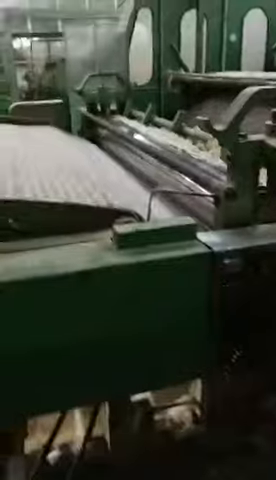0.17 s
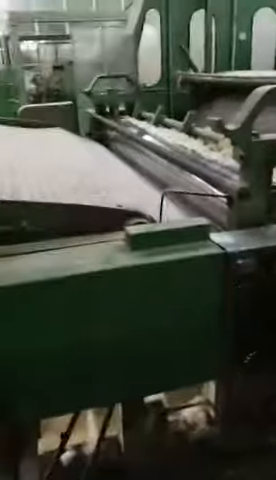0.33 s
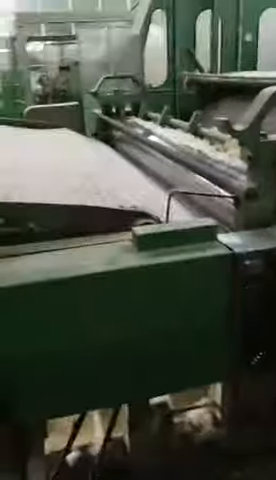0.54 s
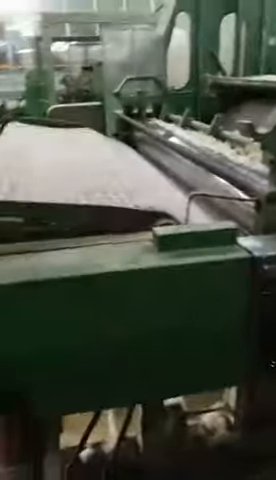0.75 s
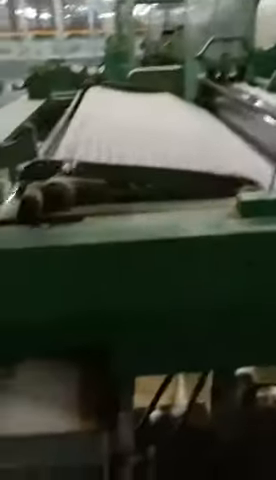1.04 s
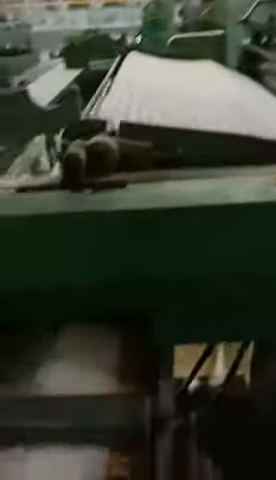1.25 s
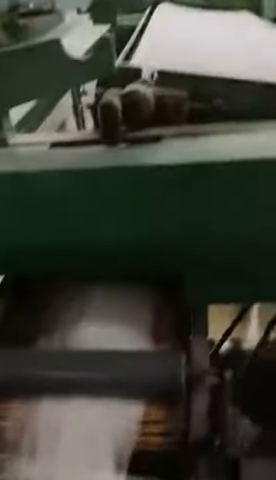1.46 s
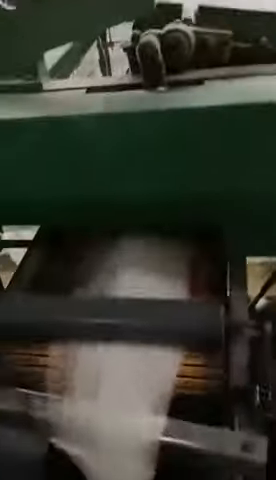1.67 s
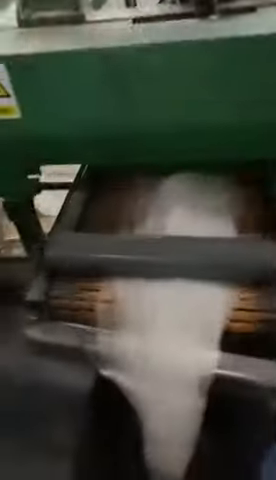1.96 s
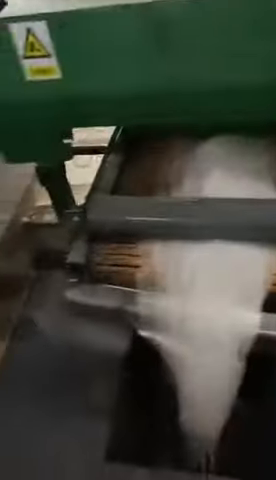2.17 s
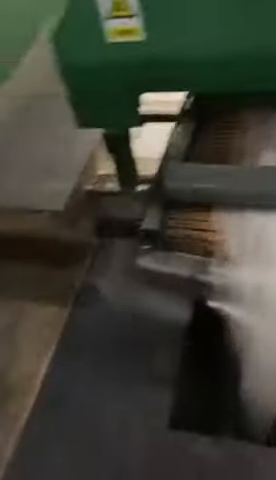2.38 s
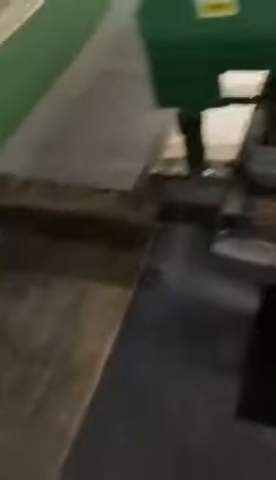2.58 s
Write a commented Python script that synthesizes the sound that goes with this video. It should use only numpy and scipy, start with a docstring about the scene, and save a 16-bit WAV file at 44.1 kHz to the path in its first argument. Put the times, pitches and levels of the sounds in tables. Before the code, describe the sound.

A large textile carding machine fades in over the first 0.4 seconds and roars steadily in a factory hall until the end, near 2.7 seconds. A high, wavering gear whine rides on top, shifting between left and right as the phone moves, with a hum, ringing clatter and thin hiss. Faint knocks of loose parts come at about 0.5, 1 and 2.1 seconds.

```python
"""Out of a brief silence, the broad roar of a carding machine's drums, belts and air fades in.
The place is a factory hall, the microphone a hand-held phone panning slowly along the machine.
The roar carries a shaft's steady hum and a gear whine near 3 kHz: a narrow band of noise with tones
spaced by the shaft speed. A weaker band sits an octave up, wire and fibre hiss, and loose parts clack."""
import sys
import numpy as np
from scipy import signal
from scipy.fft import rfft, irfft, next_fast_len
from scipy.io import wavfile
from scipy.ndimage import uniform_filter1d, map_coordinates

SR = 44100
rng = np.random.default_rng(int(sys.argv[2]) if len(sys.argv) > 2 else 0)


def put_to_file(sound):
    """Save the sound as 16-bit audio at rate SR, in the file named by the first command-line argument."""
    columns = np.atleast_2d(sound).T  # one column per channel
    safe = np.clip(columns, -1, 1)
    whole_steps = np.round(safe * 32767)
    wavfile.write(sys.argv[1], SR, whole_steps.astype(np.int16))


N = 119952
TIME_S = np.arange(N) / SR
SHAFT_HZ = 10.223

# The machine's body as the phone moves along it: time_s, roar_db, clatter_db
ROAR_LEVELS = [(.45, -20.5, -27.5), (.85, -21, -29.5), (1.12, -22, -27), (1.4, -21.5, -30),
               (1.9, -21.5, -32), (2.2, -21.5, -30), (2.7, -21, -31.5)]
# Spectra of the low roar and the midrange clatter: frequency_hz, gain_db
ROAR_SPECTRUM = [(15, -59.5), (30, -30), (50, -23), (90, -7.5), (150, -4), (250, -4.5), (320, -0.5),
                 (400, -5), (530, -3.5), (600, -6), (700, -10.5), (870, -10.5), (1000, -15.5), (1300, -35),
                 (2200, -120)]
CLATTER_SPECTRUM = [(590, -40), (1000, -4.5), (1070, 0), (1150, -3), (1270, 0.5), (1500, -2.5), (1730, -3),
                    (1870, -1.5), (2240, -1.5), (2500, -3), (3250, -41), (5500, -120)]

def drum_roar():
    """Drums, belts and air fill the hall with a low roar and a ringing clatter above it."""
    roar_db, clatter_db = curves(ROAR_LEVELS)
    roar = amp(roar_db) * rush(ROAR_SPECTRUM, patchy_db=0.7, ringing_db=0.8, flutter_db=0.75)
    clatter = amp(clatter_db) * rush(CLATTER_SPECTRUM, patchy_db=2.0, ringing_db=4.0, flutter_db=0.3)
    return roar + clatter


# The whine at the moving phone: time_s, band_db, left_minus_right_db, left_lead_rad
WHINE_PATH = [(.45, -20.5, 1.5, 1.55), (.85, -20, 1.5, 1.5), (1.2, -20.5, 4, 1.5), (1.55, -21, -2, 0.05),
              (1.9, -21, 5, -1.85), (2.2, -20, 2, -2.5), (2.45, -19.5, 3.5, -0.5), (2.7, -24, 0.5, -2)]
# Noise band round the mesh tone: frequency_hz, gain_db
WHINE_SPECTRUM = [(2300, -50), (2450, -14), (2580, -15.5), (2750, -6), (2880, -5.5), (2980, 1),
                  (3070, -10.5), (3200, -9.5), (3250, -24.5), (3300, -29), (3360, -61)]
# Weak sidebands: offset_orders (shaft speeds from the mesh tone); for each, level_db
WEAK_OFFSETS = [-26, -17, -15, -11, 3, 11, 13, 16, 17, 20, 28]
WEAK_LEVELS = [-48, -42, -44, -42, -39, -38, -43, -46, -40, -43, -48]
# Loud core tones: offset_orders; their swells: time_s, then level_db for each tone
CORE_OFFSETS = [-6, 0, 5, 6]
CORE_LEVELS = [(.55, -26.5, -31, -27, -41), (.8, -39, -35, -33, -35), (1.0, -38.5, -40, -37, -24),
               (1.3, -31, -26.5, -30.5, -34.5), (1.55, -41.5, -32.5, -26.5, -34),
               (1.8, -26, -34, -33, -32.5), (2.05, -44, -29, -29, -35), (2.3, -36, -28.5, -40.5, -35),
               (2.6, -39, -33, -34, -28)]
# Swelling of the band once and twice per beat: depth_fraction
THROB_DEPTHS = [.08, .08]

def gear_whine(mesh_hz=2921.6, beat_order=11, direct_over_hall_db=-3.5):
    """Meshing gears sing with shaft sidebands in a noise band that throbs at the tones' beat rate."""
    band_db, pan_db, lead = curves(WHINE_PATH)
    # Tones one beat rate apart are locked in phase.
    locked_phases = rng.uniform(0, 2 * np.pi, (beat_order, 1)) + 1.2 * wobble(4.8)

    def sideband(offset, db, waver_db):
        phase = locked_phases[offset % beat_order]
        return hall_tone(mesh_hz + offset * SHAFT_HZ, db, waver_db, drift_rad=0.24, lead=lead, phase=phase)

    weak = sum(sideband(k, db, waver_db=3.5) for k, db in zip(WEAK_OFFSETS, WEAK_LEVELS))
    core = sum(sideband(k, db, waver_db=2.0) for k, db in zip(CORE_OFFSETS, curves(CORE_LEVELS)))
    hall, near = [rush(WHINE_SPECTRUM, patchy_db=0.75, ringing_db=3.0, flutter_db=0.1) for _ in range(2)]
    direct = np.real(signal.hilbert(near[0]) * np.exp(1j * left_right(lead)))
    beat = 2 * np.pi * beat_order * SHAFT_HZ * TIME_S
    throb = 1 + sum(depth * np.cos(k * beat) for k, depth in enumerate(THROB_DEPTHS, 1))
    band = amp(band_db) * unit_rms(throb * (hall + amp(direct_over_hall_db) * direct))
    return amp(left_right(pan_db)) * (weak + core + band)


# Quiet shaft harmonics: order (multiple of the shaft speed); for each, level_db
QUIET_ORDERS = [9, 12, 15, 21, 24, 27, 45, 54, 69, 75, 78, 81, 84, 93, 99, 102, 105, 108, 120, 123, 126,
                129, 132, 138, 148, 177, 189, 195]
QUIET_LEVELS = [-45, -42, -37, -43, -40, -43, -41, -42, -48, -48, -48, -47, -47, -51, -50, -43, -47, -52,
                -47, -49, -45, -50, -48, -51, -52, -53, -52, -53]
# Loud shaft harmonics: order; their swells: time_s, then level_db for each order
LOUD_ORDERS = [39, 42, 48, 63, 87]
LOUD_LEVELS = [(.55, -40, -43, -35, -31.5, -32.5), (.8, -32, -51, -41.5, -33.5, -43),
               (1.051, -40, -43, -36, -32, -43.5), (1.55, -35, -42, -27.5, -32.5, -38),
               (1.8, -39, -38, -41.5, -32, -48), (2.05, -44.5, -32, -36, -36.5, -36.5),
               (2.3, -41, -32.5, -51, -31, -38.5), (2.65, -39, -24.5, -45, -36, -45)]

def shaft_hum(lead_rad=0.9):
    """The turning shaft hums at multiples of its speed, leading in the left channel."""
    quiet = sum(hall_tone(k * SHAFT_HZ, db, waver_db=2.5, drift_rad=0.37, lead=lead_rad)
                for k, db in zip(QUIET_ORDERS, QUIET_LEVELS))
    loud = sum(hall_tone(k * SHAFT_HZ, db, waver_db=2.0, drift_rad=0.53, lead=lead_rad)
               for k, db in zip(LOUD_ORDERS, curves(LOUD_LEVELS)))
    return quiet + loud


# Treble at the phone: time_s, hiss_db, octave_band_db
HISS_LEVELS = [(.2, -34, -36), (.43, -32, -34), (.47, -29, -34.5), (.52, -35, -35), (.6, -28, -31.5),
               (.66, -30, -37), (.85, -35, -42), (1.15, -34, -38), (1.3, -37, -40), (1.6, -37, -39),
               (1.85, -37.5, -41), (2.0, -38.5, -41), (2.05, -32.5, -47), (2.12, -35, -41),
               (2.4, -37.5, -39.5), (2.72, -37.5, -39.5)]
# Spectra of the hiss and the octave band: frequency_hz, gain_db
HISS_SPECTRUM = [(3250, -29), (3330, -3.5), (3400, 1), (3800, -1), (4500, -5), (5400, -6), (6500, -11.5),
                 (6850, -7), (7200, -6), (7520, -12.5)]
OCTAVE_SPECTRUM = [(5500, -50), (5650, -11), (5800, -3), (5880, -0.5), (5980, -3), (6060, -4), (6400, -11),
                   (6550, -40)]

def wire_hiss():
    """Wire and fibre hiss, with a fitful band an octave over the whine."""
    hiss_db, octave_db = curves(HISS_LEVELS)
    hiss = amp(hiss_db) * rush(HISS_SPECTRUM, patchy_db=0.9, ringing_db=4.5, flutter_db=0.0)
    octave = amp(octave_db) * rush(OCTAVE_SPECTRUM, patchy_db=1.0, ringing_db=4.5, flutter_db=-1.2)
    return hiss + octave


# Knocks under the roar: start_s, pitch_hz, level_db
KNOCKS = [(.452, 4900, -36), (1.03, 1900, -32), (2.05, 4300, -39), (2.1, 1500, -28)]

def loose_parts(rise_s=0.006, relative_width=0.2):
    """Small loose parts knock now and then, each a short puff of noise round one pitch."""
    clacks = 0
    for start_s, pitch_hz, level_db in KNOCKS:
        age = np.clip(TIME_S - start_s, 0, None) / rise_s
        noise = rng.standard_normal((2, N))
        puff = unit_rms(filtered(noise, lambda hz: np.exp(-((hz / pitch_hz - 1) / relative_width) ** 2)))
        clacks += amp(level_db) * age * np.exp(1 - age) * puff
    return clacks


# Stereo width of the hall at the phone, near mono in the bass: frequency_hz, side_over_mid_db
HALL_WIDTH = [(25, -26), (80, -35), (160, -30), (230, -24), (350, -12), (440, -6), (540, -3.5), (850, -2),
              (1200, 0), (7600, 0)]

def hall_tone(hz, db, waver_db, drift_rad, lead, phase=None):
    """A tone wandering in level and phase with the hall's echoes; high tones differ more left to right."""
    apart = np.clip(amp(at_hz(HALL_WIDTH, hz)), 0, 1)
    if phase is None:
        phase = rng.uniform(0, 2 * np.pi)
    waver = wobble(2.79)
    angle = 2 * np.pi * hz * TIME_S + phase + drift_rad * wobble(4.32)
    channels = []
    for side in (0.5, -0.5):
        gain = amp(waver_db * (waver + apart * wobble(2.7)))
        shift = apart * (side * lead + 0.5 * wobble(1.37))
        channels.append(gain * np.sin(angle + shift))
    return amp(db) * unit_rms(np.array(channels))


def rush(spectrum, patchy_db, ringing_db, flutter_db):
    """Stereo hall noise of rms 1 with broad patches of random gain, brief ringing and a quick flutter."""
    cells = signal.stft(rng.standard_normal((2, N)), nperseg=1024)[2]

    def patches(bins, frames):
        field = uniform_filter1d(rng.standard_normal(cells.shape[1:]), bins, axis=0)
        return unit_rms(uniform_filter1d(field, frames, axis=1))

    def mid_side_gains(hz):
        spread = np.arctan(amp(at_hz(HALL_WIDTH, hz)))
        return amp(at_hz(spectrum, hz)) * [np.cos(spread), np.sin(spread)]

    gain_db = patchy_db * patches(7, 6) + ringing_db * patches(2, 6)
    noise = signal.istft(cells * amp(gain_db), nperseg=1024)[1][:, :N]
    mid, side = filtered(noise, mid_side_gains)
    flutter = amp(flutter_db * wobble(12.24))
    return unit_rms(flutter * np.array([mid + side, mid - side]))


def amp(db):
    return 10 ** (np.asarray(db) / 20)


def unit_rms(x):
    return x / np.sqrt(np.mean(x ** 2) + 1e-20)


def left_right(difference):
    """Half of a difference added on the left, half taken off on the right."""
    return np.outer([0.5, -0.5], difference)


def at_hz(points, hz):
    """Interpolate (frequency_hz, value) points on a log axis."""
    frequencies, values = np.transpose(points)
    return np.interp(np.log(hz + 1), np.log(frequencies + 1), values)


def curves(rows):
    """One value per sample for each column after time_s."""
    times, *columns = np.transpose(rows)
    return [np.interp(TIME_S, times, column) for column in columns]


def wobble(knots_per_s):
    """A smooth random curve."""
    return map_coordinates(rng.standard_normal(200), [TIME_S * knots_per_s])


def filtered(x, response):
    """Shape x by a gain that depends on frequency."""
    size = next_fast_len(N + SR // 2)
    return irfft(rfft(x, size) * response(np.fft.rfftfreq(size, 1 / SR)), size)[..., :N]


def scene():
    """The whole machine, heard from beside it in the hall."""
    return shaft_hum() + drum_roar() + gear_whine() + wire_hiss() + loose_parts()


# Colour of the phone's two microphone ports: frequency_hz, left_minus_right_db
PORT_BALANCE = [(300, -1), (430, 3.5), (600, -0.5), (1400, 0.5), (3000, -1), (4500, -3.5), (7000, -2)]

def record(dry, matched_below_hz=200, start_s=0.12, fade_s=0.28, top_hz=7540):
    """The phone's ports differ in colour above the bass; the sound fades in and the top treble is cut."""
    balance = [(matched_below_hz, 0)] + PORT_BALANCE
    ports = filtered(dry, lambda hz: amp(left_right(at_hz(balance, hz))))
    since_s = TIME_S - start_s
    fade = np.clip(0.047 + since_s / fade_s, 0, 1)
    gate = np.clip(since_s / 0.0042, 0, 1)
    return filtered(ports * fade * gate, lambda hz: np.clip((top_hz - hz) / 60, 0, 1))


dry = scene()
out = record(dry)
put_to_file(out)
```